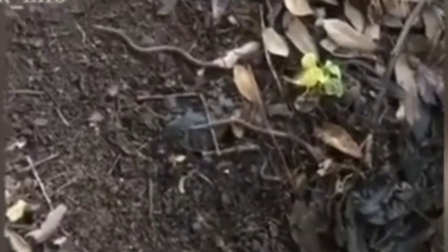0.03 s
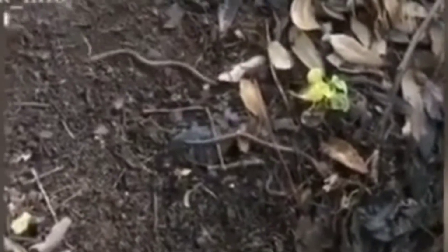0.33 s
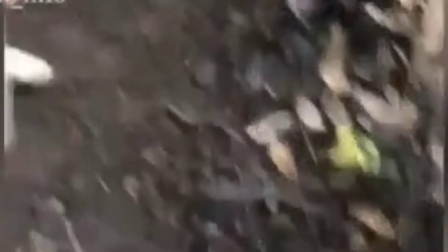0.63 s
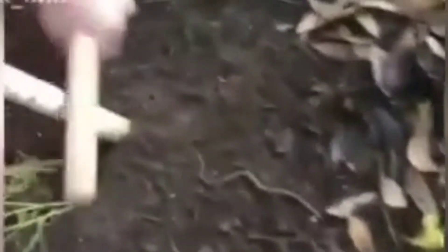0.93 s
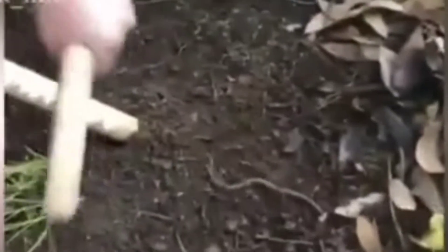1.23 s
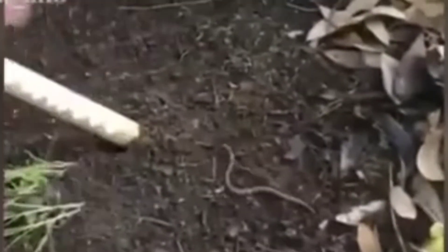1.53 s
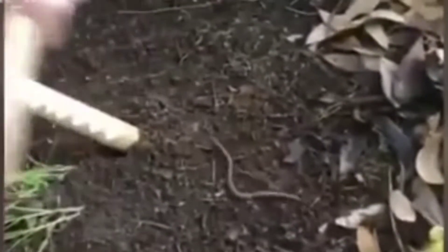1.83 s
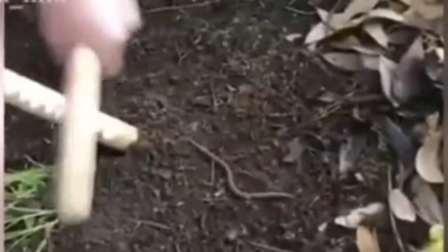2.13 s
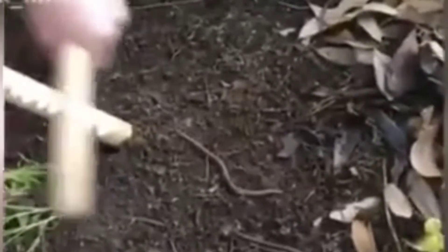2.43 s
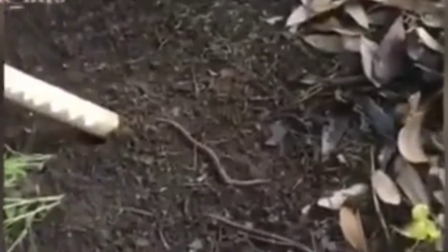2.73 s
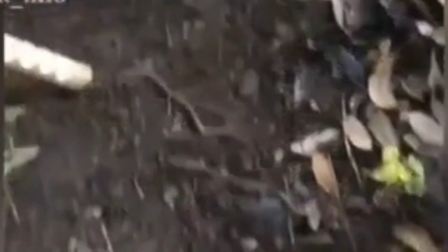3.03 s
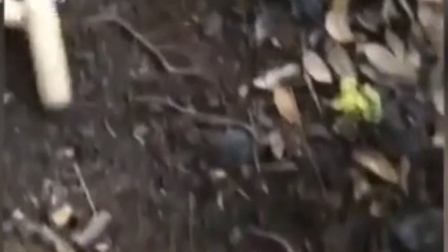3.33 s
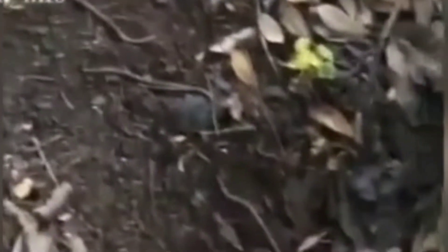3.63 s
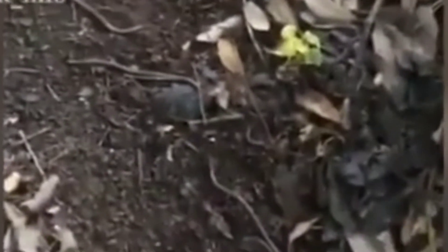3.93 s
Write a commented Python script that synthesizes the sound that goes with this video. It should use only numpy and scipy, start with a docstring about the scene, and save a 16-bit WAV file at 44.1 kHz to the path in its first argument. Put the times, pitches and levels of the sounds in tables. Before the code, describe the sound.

Close, rhythmic wooden rasping comes from a stick rubbed across a notched stake outdoors. Thudding pushes alternate with higher ringing pulls throughout, with small crackles and a light scraping hiss over faint open air.

```python
"""Dry wooden knocks rattle close by: a stick is rubbed to and fro over a notched stake in the soil.
Each notch gives one knock, whose low tones arrive late because slow bends travel slower in wood.
Pushes thud and end on a hollow knock; pulls ring higher. Fibres snap, and the sliding wood
hisses between the notches. Behind it are soft outdoor air and a distant hum that fades away."""
import sys
import numpy as np
from scipy import signal
from scipy.fft import rfft, irfft
from scipy.io import wavfile

SR = 44100
rng = np.random.default_rng(int(sys.argv[2]) if len(sys.argv) > 2 else 0)


def store_wav(level_fs):
    """Save 16-bit WAV to argv[1]."""
    pcm = np.round(np.clip(np.atleast_2d(level_fs), -1, 1) * 32767)
    wavfile.write(sys.argv[1], SR, pcm.T.astype(np.int16))


N = 176400
SIZE = 4096   # samples used to build one knock
TIME = np.arange(N) / SR
KNOCK_HZ = np.maximum(np.arange(SIZE // 2 + 1) * SR / SIZE, 1)

# notches hit on a push: t/s, level/dB of the middle tones
PUSHES = [(0.0712, -31.5), (0.082, -35.5), (0.0986, -26.5), (0.1107, -28.5), (0.1212, -27.5),
          (0.1317, -23.5), (0.1457, -23.5), (0.1662, -25.5), (0.1876, -23.5), (0.5117, -33), (0.548, -27.5),
          (0.565, -29.0), (0.586, -30), (0.5959, -30), (0.6259, -26.5), (0.9016, -29.5), (0.9208, -22),
          (0.9338, -30), (0.9448, -29), (0.9564, -25.5), (0.9715, -27.5), (0.9922, -22), (1.0127, -23.5),
          (1.2948, -30.5), (1.3166, -30.5), (1.3312, -28), (1.3472, -27.5), (1.3812, -31), (1.4118, -20),
          (1.4487, -22.5), (1.7415, -24), (1.755, -27.5), (1.7692, -25.5), (1.7833, -31.5), (1.8015, -28.5),
          (1.8221, -21.5), (1.8412, -27), (1.8687, -31), (2.1383, -29), (2.1535, -27), (2.1678, -25.0),
          (2.1851, -20.5), (2.2061, -20.5), (2.2246, -20.5), (2.5213, -24.5), (2.5365, -25.5),
          (2.554, -27.5), (2.5867, -27), (2.5923, -32.5), (2.6127, -25.0), (2.6317, -32.5), (2.6576, -25.5),
          (2.9565, -24.5), (2.9701, -28.5), (2.9826, -33.5), (2.9975, -25.5), (3.0359, -25), (3.048, -31),
          (3.0604, -35), (3.0761, -25), (3.391, -24.0), (3.4101, -29.5), (3.4239, -32), (3.4407, -28.5),
          (3.4604, -26.5), (3.4721, -31), (3.4833, -29.5), (3.5023, -26), (3.7871, -22.5), (3.8007, -22.5),
          (3.8141, -30), (3.8285, -25.5), (3.8421, -28.5), (3.8497, -31.5), (3.8652, -35), (3.9027, -23.0)]
# notches hit on a pull: t/s, level/dB of the middle tones
PULLS = [(0.0084, -37.5), (0.2913, -26.0), (0.3147, -20.5), (0.337, -27.5), (0.3607, -25.5),
         (0.3855, -24.5), (0.7061, -32.5), (0.7187, -25.0), (0.7384, -20.5), (0.765, -21.5),
         (0.7888, -23.5), (0.8133, -23), (0.8303, -26.5), (1.1268, -21), (1.1508, -23), (1.197, -29.5),
         (1.2161, -25.5), (1.5178, -37), (1.5557, -25), (1.5756, -29.5), (1.5854, -34), (1.6143, -26),
         (1.6291, -28.5), (1.6429, -26), (1.66, -30.5), (1.9446, -32.5), (1.9675, -21), (1.997, -22.5),
         (2.0253, -19), (2.0497, -23.5), (2.3039, -27.5), (2.3413, -21.5), (2.3658, -25.5), (2.394, -19),
         (2.4067, -30.5), (2.4199, -25), (2.752, -32), (2.7728, -24), (2.792, -32.5), (2.8, -32.5),
         (2.8305, -28), (2.844, -29), (3.1701, -29.5), (3.1852, -26), (3.2031, -27), (3.2253, -19.0),
         (3.2462, -23.5), (3.2594, -28), (3.274, -29.5), (3.5753, -32.0), (3.5919, -37), (3.6093, -31.5),
         (3.6143, -27), (3.6363, -19), (3.659, -27), (3.6815, -21.5), (3.9941, -29)]
# ring of stick and stake: f/Hz, then relative level/dB at push start, push end, pull start, pull end
BODY_RING = [(95, -19.5, -10, -26.5, -20), (180, 3.5, 6, -8, -1), (486, -6.5, -8.5, -5.5, -2.5),
             (602, -4.5, -7, -3.5, 2.5), (870, -6, 6.5, 0, -3.5), (1012, 2.5, 1, 5.5, -1),
             (1274, 2.5, -14, -0.5, -4), (1390, -2, -3.5, 0.5, 2.5), (1910, -1.5, 0.5, -9, -1),
             (2340, -6, -15, -9.5, -6.5)]
# high ring of the wood, shared by all knocks: f/Hz, relative level/dB
HIGH_RING = [(2750, -8.5), (3300, -13), (3700, -18.5), (4500, -12.5), (5600, -29), (6700, -23), (7900, -33),
             (9200, -27), (10200, -41.5), (11500, -30), (13000, -44.5)]
# fibres snapping on a notch edge: t/s, level/dB, f/Hz of the boosted ring
FIBRE_SNAPS = [(0.1663, -27, 4700), (0.1881, -23.5, 4800), (0.3156, -21, 11900), (0.3876, -35.5, 4500),
               (0.7888, -26.5, 4500), (0.8137, -17, 4850), (0.9213, -26.5, 7400), (0.9919, -23.0, 9000),
               (1.1269, -38.5, 4300), (1.4134, -29, 2900), (1.6294, -34, 2770), (1.8403, -26.5, 11800),
               (1.9692, -19.5, 5900), (2.2245, -28.5, 6500), (2.3435, -29, 4250), (2.3932, -25.5, 2940),
               (2.5549, -28, 9100), (2.6581, -23.5, 6800), (2.7717, -25.0, 9450), (3.6603, -31.5, 4580),
               (3.786, -22, 4970), (3.8494, -27, 11500), (3.865, -33, 11400)]
# tone of sliding wood: f/Hz, relative level/dB
RUB_TONE = [(1500, 6), (4500, -5), (13000, -17)]
# longer slides on smooth wood: t/s of the middle, half length/s, level/dB
SMOOTH_SLIDES = [(1.015, 0.016, -40), (1.873, 0.013, -46.5), (2.051, 0.049, -47.5), (3.68, 0.064, -54),
                 (3.791, 0.075, -44), (3.973, 0.028, -43)]
# tone of the outdoor air: f/Hz, relative level/dB
AIR_TONE = [(25, -38), (50, -6.5), (200, 2.5), (450, -7), (1200, -16), (13000, -29.5)]
# fading of the distant hum: t/s, level/dB
HUM_FADE = [(0, -50.5), (1.85, -53), (2.4, -73)]

MID_LOW_HZ, MID_HIGH_HZ = 700, 2500   # the middle tones
LEVEL_SPAN_S = .01   # knock and snap levels count their energy as spread over this time
STROKE_GAP_S = .07   # a longer pause starts a new stroke
CRUNCH_DB, CRUNCH_S = -3, .0027   # fibres crush just after the contact


def rasp(skim_db=-37.5, skim_gap_s=.024, touch_db=-42, touch_gap_s=.017):
    """The stick knocks from notch to notch, and the ring changes as it travels along the stake."""
    out = np.zeros(N)
    _, push_start, push_end, pull_start, pull_end = np.transpose(BODY_RING)
    for notches, start, end in ((PUSHES, push_start, push_end), (PULLS, pull_start, pull_end)):
        for stroke in strokes(notches):
            times = stroke[:, 0]
            for s, db in stroke:
                along = (s - times[0]) / max(np.ptp(times), STROKE_GAP_S)
                ring_db = start + (end - start) * along ** 5.3   # changes mostly near the end
                add(out, s, knock(db, ring_db))
            for before, after in zip(times, times[1:-1]):
                if after - before > skim_gap_s:   # a notch is skimmed in a long gap
                    add(out, (before + after) / 2, knock(skim_db, start))
    for stroke in strokes(PULLS):   # a light touch before and after each pull
        add(out, stroke[0, 0] - 2 * touch_gap_s, knock(touch_db, pull_start))
        add(out, stroke[-1, 0] + touch_gap_s, knock(touch_db, pull_end))
    return out


def knock(level_db, ring_db, pitch_wander=.015, bounce_chance=.25, bounce_db=-7):
    """The stick drops into one notch: a blow, crushed fibres and perhaps a bounce make the wood ring."""
    body_hz = np.array(BODY_RING)[:, 0]
    ring = np.vstack([np.column_stack([body_hz, ring_db]), HIGH_RING])
    tone_db = at_hz(ring, KNOCK_HZ * np.exp(pitch_wander * rng.standard_normal()))
    lows = 1 / (1 + (2 * KNOCK_HZ / MID_LOW_HZ) ** 4)
    thud_db = lows * (-26 - level_db)   # soft and loud knocks thud much alike
    body = ringing(tone_db + thud_db + contact_colour(lows))
    bounce_s = .002 * (.5 + rng.random())
    bounce = (rng.random() < bounce_chance) * np.exp(-2j * np.pi * KNOCK_HZ * bounce_s)
    crunch = (1 - lows) * rfft(burst(CRUNCH_S, SIZE))
    contact = 1 + from_db(bounce_db) * bounce + from_db(CRUNCH_DB) * crunch
    bass_cut = np.minimum(KNOCK_HZ / body_hz[0], 1) ** 2
    spectrum = body * contact * bending_delay() * bass_cut
    mids = irfft(spectrum * (KNOCK_HZ > MID_LOW_HZ) * (KNOCK_HZ < MID_HIGH_HZ))
    return gain_to(level_db, mids) * irfft(spectrum)[:SIZE // 2]


def contact_colour(lows, spread_db=2, treble_db=3.5):
    """Each point of contact colours the ring at random, in bands spaced like a bending bar's tones."""
    treble = np.clip(np.log(KNOCK_HZ / 1260) / np.log(8850 / 1260), 0, 1)
    bar_scale = np.sqrt(KNOCK_HZ / KNOCK_HZ[-1])
    ripple = np.interp(bar_scale, np.linspace(0, 1, 48), rng.standard_normal(48))
    return ripple * (spread_db * (1 - lows) + treble_db * treble)


def bending_delay(travel_at_1khz_s=.0043, top_hz=2028):
    """Bending waves bring the low tones late; all tones above top_hz arrive together."""
    travel_s = travel_at_1khz_s * np.sqrt(1000 / np.minimum(KNOCK_HZ, top_hz))
    cycles = np.cumsum(travel_s - travel_s.min()) * SR / SIZE
    return np.exp(-2j * np.pi * cycles)


def snaps(tilt_db_per_octave=9, peak_db=11.5, width_octaves=.36, decay_s=.00058):
    """A fibre gives way in a short crackle that favours one high ring of the wood."""
    out = np.zeros(N)
    for s, db, hz in FIBRE_SNAPS:
        octaves = np.log2(KNOCK_HZ / hz)
        boost_db = peak_db * np.exp(-(octaves / width_octaves) ** 2)
        tone_db = at_hz(HIGH_RING, KNOCK_HZ) + tilt_db_per_octave * octaves + boost_db
        crackle = burst(decay_s, SIZE) + from_db(CRUNCH_DB) * burst(CRUNCH_S, SIZE)
        sound = butter(irfft(ringing(tone_db) * rfft(crackle)), MID_HIGH_HZ, "high")
        add(out, s, gain_to(db, sound) * sound)
    return out


def rub(level_db=-43, fade_s=.016, grain_db=5, slide_hz=3500):
    """Wood slides on wood: a grainy hiss dies away after each notch and swells in the longer slides."""
    contact = np.zeros(N)
    for s, _ in [*PUSHES, *PULLS]:
        add(contact, s, np.exp(-TIME[:SIZE] / fade_s))
    flutter = rms_one(butter(rng.standard_normal(N), 280, "low"))
    hiss = rms_one(noise(RUB_TONE) * from_db(grain_db * flutter))
    slides = sum(from_db(db) * np.exp(-((TIME - s) / half_s) ** 2) for s, half_s, db in SMOOTH_SLIDES)
    return from_db(level_db) * contact * hiss + slides * rms_one(butter(hiss, slide_hz, "high"))


def echo(x, gain_db=-40, fade_60db_s=.45, dull_hz=5100):
    """The ground and things nearby throw back a faint, dull echo."""
    tail = burst(fade_60db_s / np.log(1000), SR // 2)
    return from_db(gain_db) * butter(signal.fftconvolve(x, tail)[:N], dull_hz, "low", order=1)


def distant_hum(pitch_hz=90, wobble_hz=2):
    """A far-off low tone wavers and fades."""
    wobble = rms_one(butter(rng.standard_normal(N), 5.5, "low"))
    tone = np.sqrt(2) * np.sin(2 * np.pi * np.cumsum(pitch_hz + wobble_hz * wobble) / SR)
    return tone * from_db(np.interp(TIME, *np.transpose(HUM_FADE)))


def outdoor_air(level_db=-50):
    """The open air makes a soft, steady rush."""
    return from_db(level_db) * noise(AIR_TONE)


def strokes(notches):
    """Group notches into strokes at the pauses."""
    rows = np.array(notches)
    return np.split(rows, np.flatnonzero(np.diff(rows[:, 0]) > STROKE_GAP_S) + 1)


def ringing(db):
    """Spectrum of a body with these levels that rings only after the blow."""
    cepstrum = irfft(np.log(from_db(db)))
    cepstrum[1:SIZE // 2] *= 2
    cepstrum[SIZE // 2 + 1:] = 0
    return np.exp(rfft(cepstrum))


def burst(decay_s, size):
    """Dying noise with a total energy of 1."""
    x = rng.standard_normal(size) * np.exp(-TIME[:size] / decay_s)
    return x / np.linalg.norm(x)


def noise(tone):
    """Steady noise shaped by a tone table."""
    gains = from_db(at_hz(tone, np.arange(N // 2 + 1) * SR / N))
    return rms_one(irfft(rfft(rng.standard_normal(N)) * gains, N))


def at_hz(tone, hz):
    """Read levels between the rows of a tone table, on an octave scale."""
    f, db = np.transpose(tone)
    return np.interp(np.log(np.maximum(hz, 1)), np.log(f), db)


def gain_to(db, sound):
    """The gain that brings a short sound to this level."""
    return from_db(db) * np.sqrt(LEVEL_SPAN_S * SR) / np.linalg.norm(sound)


def from_db(db):
    """Turn decibels into a gain."""
    return 10 ** (np.asarray(db) / 20)


def rms_one(x):
    """Scale to an average strength (rms) of 1."""
    return x / np.sqrt(np.mean(x ** 2) + 1e-20)


def butter(x, hz, kind, order=2):
    """Keep the "low" or "high" side of hz."""
    return signal.sosfilt(signal.butter(order, hz, kind, fs=SR, output="sos"), x)


def add(track, s, sound):
    """Mix a sound in at s seconds."""
    i = int(np.clip(s * SR, 0, N - 1))
    track[i:i + len(sound)] += sound[:N - i]


def scene(width_db=-16, width_hz=5000, smear_s=.00135):
    """Everything lies straight ahead; only the treble spreads a little to the sides."""
    wood = rasp() + snaps() + rub()
    centre = wood + echo(wood) + distant_hum() + outdoor_air()
    smeared = signal.fftconvolve(centre, burst(smear_s, SIZE))[:N]
    side = from_db(width_db) * butter(smeared, width_hz, "high", order=1)
    return np.array([centre + side, centre - side])


def record(dry, cutoff_hz=13150):
    """Round off the peaks and cut the highest treble."""
    return signal.sosfilt(signal.ellip(10, .3, 70, cutoff_hz, fs=SR, output="sos"), np.tanh(dry))


dry = scene()
out = record(dry)
store_wav(out)
```